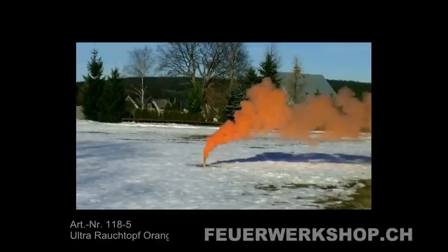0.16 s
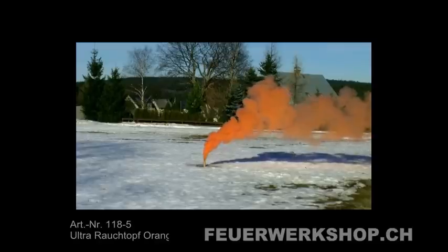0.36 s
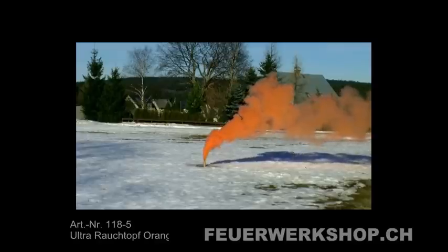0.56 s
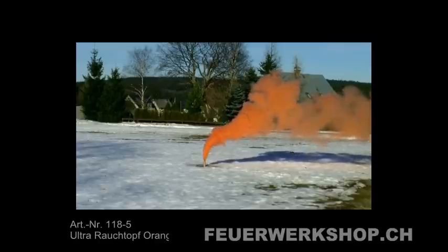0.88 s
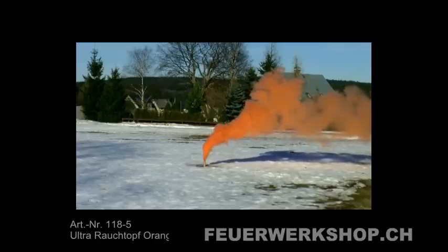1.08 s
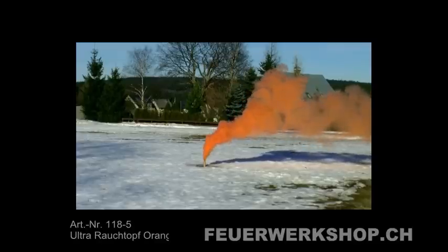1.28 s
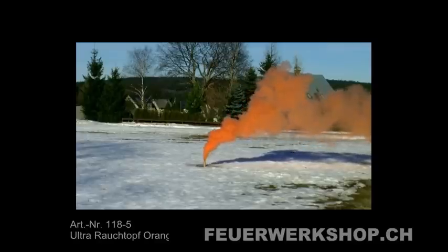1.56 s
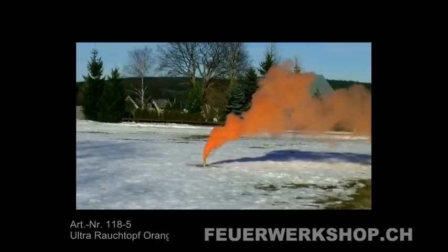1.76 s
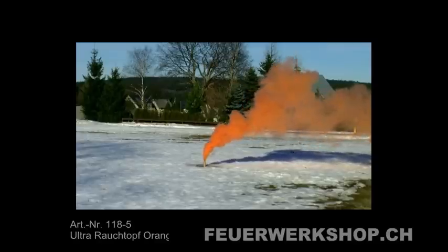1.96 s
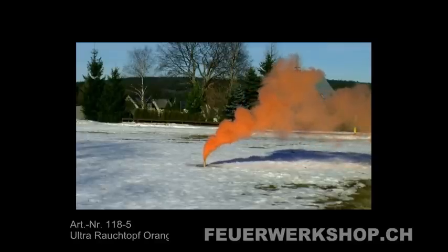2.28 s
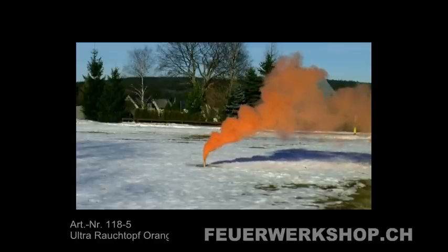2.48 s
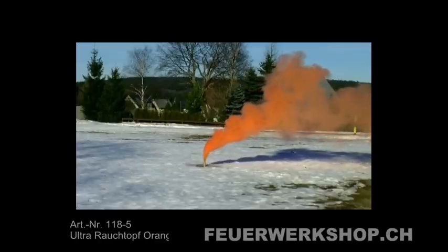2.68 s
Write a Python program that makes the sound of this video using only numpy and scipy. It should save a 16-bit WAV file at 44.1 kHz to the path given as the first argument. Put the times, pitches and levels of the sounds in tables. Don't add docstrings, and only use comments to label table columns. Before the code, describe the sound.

Steady gassy hiss of a burning smoke pot, peppered with snaps, pops and brief sputtering puffs.

```python
import sys
import numpy as np
from scipy import signal
from scipy.io import wavfile
from scipy.ndimage import uniform_filter1d, map_coordinates

SR = 44100
rng = np.random.default_rng(int(sys.argv[2]) if len(sys.argv) > 2 else 0)


def to_linear_factor(level_db):
    exponent = np.asarray(level_db, float) / 20
    return 10 ** exponent


def transcribe(signal):
    frames = np.atleast_2d(signal).T
    limited = np.clip(frames, -1, 1)
    pcm = np.round(limited * 32767).astype(np.int16)
    wavfile.write(sys.argv[1], SR, pcm)


N = 125244

# pitch_hz, level_db (per Hz)
JET_SPECTRUM = [(30, -32), (330, -5.5), (560, -1.5), (1150, -3), (1800, -13.5), (2800, -8), (4300, -18),
                (12000, -22.5)]
# time_s, flow_db
GAS_FLOW = [(0, 0.5), (.15, 1), (.27, 2), (.4, 1), (.65, 1.5), (.85, 2), (1.05, 1), (1.27, 1.5), (1.4, 2),
            (1.58, -0.5), (1.75, -3), (1.9, 4.5), (2.02, -1), (2.1, 2), (2.25, -1.5), (2.55, 0.5),
            (2.62, 0), (2.84, -1.5)]
# time_s, level_db
ROAR_SWELL = [(0, 0.5), (2.0, 0.5), (2.15, 0.2), (2.35, 1.2), (2.45, 0), (2.55, 3), (2.68, 1.4),
              (2.84, 0.3)]
# start_s, level_db
PUFFS = [(2.0882, -41), (2.103, -39), (2.109, -40), (2.1249, -41), (2.142, -44), (2.156, -40),
         (2.1707, -38.5), (2.1871, -39), (2.2018, -40.5), (2.2153, -41), (2.2304, -41), (2.244, -43),
         (2.2604, -40.5), (2.2728, -39.5), (2.2847, -43.5), (2.2977, -41), (2.3113, -39), (2.3217, -43),
         (2.3336, -40.5), (2.3448, -42), (2.358, -39), (2.3713, -41.5), (2.3872, -42), (2.403, -35),
         (2.4144, -39), (2.4363, -39), (2.4566, -43), (2.4682, -37.5), (2.4901, -41), (2.5117, -38),
         (2.53, -41), (2.5626, -48), (2.5837, -52), (2.607, -45), (2.6212, -42)]
# pitch_hz, width_hz, level_db
MOUTH_RESONANCES = [(760, 520, 7.5), (1690, 670, 3), (2330, 760, 3), (2900, 280, -4.5)]
# start_s, peak_db, pitch_hz, width_hz
SNAPS = [(0.0264, -31.8, 9160, 4800), (0.0349, -30.3, 8560, 5000), (0.0571, -30.9, 8460, 4900),
         (0.099, -29.5, 6600, 4300), (0.2358, -30.6, 7690, 4500), (0.2492, -18.4, 6590, 4000),
         (0.2607, -22.1, 7760, 5200), (0.2649, -26.2, 9670, 4000), (0.2686, -29.5, 6820, 5200),
         (0.3146, -32.3, 5470, 3400), (0.3173, -29.2, 8020, 6600), (0.3455, -25.1, 9370, 5000),
         (0.4198, -34.8, 10630, 3100), (0.4603, -29.3, 9050, 4700), (0.4764, -29.4, 7900, 7500),
         (0.6293, -27.0, 9630, 4300), (0.7009, -35.6, 8410, 3800), (0.7464, -34.0, 8510, 4900),
         (0.8071, -17.6, 6480, 3900), (0.8231, -32.1, 8500, 5600), (0.8624, -28.0, 7430, 4100),
         (0.9601, -28.2, 8910, 4300), (1.0148, -35.6, 7530, 5600), (1.0712, -32.7, 7880, 5100),
         (1.1284, -33.6, 6760, 4800), (1.1669, -27.3, 8140, 4100), (1.1911, -31.5, 6200, 5100),
         (1.2191, -32.7, 5540, 3700), (1.2553, -26.4, 7120, 3900), (1.2627, -25.9, 7570, 4000),
         (1.2927, -18.1, 7310, 4000), (1.3368, -22.0, 8270, 3100), (1.4136, -26.1, 7940, 4900),
         (1.4715, -20.7, 6820, 4300), (1.4799, -26.1, 8550, 5000), (1.5124, -28.9, 8610, 3600),
         (1.5661, -22.2, 8570, 3600), (1.5763, -27.5, 7870, 3100), (1.5898, -24.2, 8950, 3500),
         (1.6667, -29.3, 7640, 3800), (1.8571, -31.5, 6630, 4800), (1.8851, -24.7, 8990, 3500),
         (2.0032, -33.0, 6070, 4100), (2.0969, -24.6, 9190, 4600), (2.1637, -10.4, 6500, 9500),
         (2.2976, -21.7, 7330, 4200), (2.5798, -26.9, 9400, 3800), (2.6063, -24.9, 8340, 4600),
         (2.6952, -33.6, 6490, 4100)]
# start_s, peak_db, pitch_hz
POPS = [(.0957, -26, 2600), (.099, -31, 2900), (.2608, -29, 2630), (.3146, -29, 2740), (.4766, -34, 2830),
        (.8073, -25, 3400), (.8245, -35, 3500), (.8633, -36, 3290), (1.0735, -33, 2700),
        (1.1902, -30, 3200), (1.1913, -28, 3200), (1.2192, -32, 3400), (1.2932, -28, 2770),
        (1.4267, -34, 3420), (1.4717, -21.5, 2960), (1.8571, -34, 3100), (1.8854, -31, 2840),
        (2.1636, -19, 2300), (2.2974, -30, 3000), (2.4029, -28, 2300), (2.8064, -34, 2940)]
# start_s, peak_db, pitch_hz
TICKS = [
    (.3225, -62, 8550),
    (.447, -43, 3130),
    (.487, -32, 5150),
    (1.204, -45, 1000),
    (1.328, -30, 8550),
    (1.4825, -31, 9800),
    (1.505, -36, 9600),
    (1.541, -35, 1000),
    (1.557, -40, 990),
    (2.182, -35, 7500),
]
# start_s, peak_db, pitch_hz, width_hz
SPRAYS = [
    (.024, -35.5, 8000, 9000),
    (.2642, -26, 6860, 10000),
    (.483, -33, 5470, 5000),
    (.8228, -36, 6000, 9000),
    (1.257, -38, 8000, 9000),
    (1.8865, -37, 8500, 9000),
    (2.1645, -29.5, 9000, 7000),
]
# pitch_hz, level_db (rms), drift_share (of the pitch)
MOTOR_LINES = [
    (469.6, -61, .003),
    (586.9, -54.5, .0004),
    (939.6, -57.5, .003),
]
# start_s, end_s
MONO_STRETCHES = [(.021, 0.058), (.215, 0.35), (.625, 0.7), (.772, 0.84), (1.138, 1.17), (1.279, 1.386),
                  (1.88, 1.912), (2.068, 2.12), (2.157, 2.23), (2.294, 2.33)]
# start_s, top_hz
TREBLE_REACH = [(0, 13600), (.055, 14200), (.14, 13400), (.195, 14100), (.232, 12400), (.252, 14300),
                (.3, 13700), (.43, 12500), (.5, 13600), (.58, 14100), (.68, 13300), (.79, 12500),
                (.81, 14100), (.865, 12900), (.93, 13400), (1.04, 13000), (1.08, 13500), (1.2, 14300),
                (1.285, 12500), (1.32, 13900), (1.38, 13300), (1.46, 12400), (1.5, 13500), (1.57, 14000),
                (1.68, 13400), (1.875, 14200), (1.935, 13400), (2.09, 12300), (2.169, 14200), (2.18, 13100),
                (2.24, 12700), (2.31, 13200), (2.5, 12500), (2.56, 13700), (2.64, 12700), (2.69, 13200)]

LEFT_OVER_RIGHT_DB = 6.5


def level(x, db):
    return x * to_linear_factor(db) / np.sqrt(np.mean(x ** 2))


def curve(rows):
    return np.interp(np.arange(N) / SR, *np.array(rows).T)


def band(x, hz, width):
    hz = np.clip(hz, 15, .45 * SR)
    return signal.lfilter(*signal.iirpeak(hz, hz / min(width, .3 * SR), fs=SR), x)


def walk(rate):
    hold = int(SR / rate)
    steps = np.repeat(rng.standard_normal(N // hold + 1), hold)
    return 1.49 * uniform_filter1d(uniform_filter1d(steps, hold), hold)[:N]


def pan(db):
    return np.array([[to_linear_factor(db)], [1]]) * 2 / (1 + to_linear_factor(db))


def jet():
    roar_hz, bright_from_hz = 720, 2640
    swell_db, flicker_db, own_flicker_db = -1, 1.6, 0.78
    unlike_db, unlike_bright_db = -19.5, 10
    swell, flow, flicker = walk(0.21), curve(GAS_FLOW), walk(24.64)
    roar = 1.37 * curve(ROAR_SWELL)
    table_hz, table_db = np.array(JET_SPECTRUM).T
    out = 0
    for hz in 30 * 2 ** np.arange(0, 8.9, 1 / 3):
        bright = hz ** 2 / (hz ** 2 + bright_from_hz ** 2)
        db = np.interp(np.log(hz), np.log(table_hz), table_db) + 10 * np.log10(hz)
        db = db + swell_db * swell + own_flicker_db * walk(11.61)
        db = db + np.exp(-np.log2(hz / roar_hz) ** 2) * roar
        db = db + bright * (flow + flicker_db * flicker)
        noise = rng.standard_normal((2, N))
        noise = band(band(noise, hz, hz / 3), hz, hz / 2) / np.sqrt(hz)
        shared = pan(LEFT_OVER_RIGHT_DB) * noise[0]
        unlike = to_linear_factor(unlike_db + unlike_bright_db * bright) * noise[1] * np.array([[1], [-1]])
        out = out + to_linear_factor(db) * (shared + unlike)
    return level(out, -41)


def sputter():
    puff_s, rise_s, mouth_top_hz = .0023, .001, 3600
    when, puff_db = np.array(PUFFS).T
    clicks = np.zeros(N)
    clicks[((when - rise_s) * SR).astype(int)] = to_linear_factor(puff_db)
    t = np.arange(800) / SR
    puff = t / puff_s * np.exp(1 - 2 * t / puff_s)
    gush = signal.fftconvolve(clicks, puff)[:N] * rng.standard_normal(N) + 3.5 * clicks
    gush = signal.sosfilt(signal.butter(6, mouth_top_hz, fs=SR, output="sos"), gush)
    rung = sum(to_linear_factor(db) * band(gush, hz, width) for hz, width, db in MOUTH_RESONANCES)
    return pan(LEFT_OVER_RIGHT_DB) * 4.16 * rung


def ringing(rows, q):
    return np.c_[rows, np.array(rows)[:, 2] / q]


def bursts(rows, tail_s, tail_db, lag_s):
    size = 512
    out, t = np.zeros(N + 1024), np.arange(size) / SR
    spray = rng.standard_normal((len(rows), size))
    for (start_s, db, hz, width), noise in zip(rows, spray):
        push = to_linear_factor(tail_db) * noise * np.exp(-t / tail_s)
        push[0] = -1
        grain = band(band(push, hz, width), hz, 2 * width)
        i = int(max(start_s + lag_s, 0) * SR)
        out[i:i + size] += grain * to_linear_factor(db) / abs(grain).max()
    return pan(LEFT_OVER_RIGHT_DB) * signal.lfilter(*signal.butter(2, 14000, fs=SR), out[:N])


def snaps():
    return to_linear_factor(1.5) * bursts(SNAPS, tail_s=.0018, tail_db=-22, lag_s=-.00015)


def pops():
    return to_linear_factor(-1.5) * bursts(ringing(POPS, 2.5), tail_s=.0015, tail_db=-24, lag_s=-.0003)


def ticks():
    return bursts(ringing(TICKS, 3.6), tail_s=0.0016, tail_db=-9, lag_s=.0008)


def sprays():
    return bursts(SPRAYS, tail_s=0.0063, tail_db=0, lag_s=0)


def fizz():
    per_s, base_db, spread_db, top_db, centre_hz = 270, -47, 4, -35, 6820
    when, size, pitch = rng.random((int(per_s * N / SR), 3)).T
    flow = curve(GAS_FLOW)[(when * N).astype(int)]
    peak_db = np.minimum(base_db + 2.0 * flow - spread_db * np.log(size), top_db)
    hz = centre_hz * 2 ** (1.8 * (pitch - .45))
    grains = np.c_[when * N / SR, peak_db, hz]
    return bursts(ringing(grains, 1.07), tail_s=0.00066, tail_db=-7, lag_s=0)


def motor():
    wobble_db = 2
    hum = np.zeros(N)
    for hz, db, drift in MOTOR_LINES:
        loudness = to_linear_factor(db + wobble_db * walk(9.4))
        phase = 2 * np.pi * hz * np.cumsum(1 + drift * walk(20)) / SR
        hum += loudness * np.sin(phase)
    return pan(LEFT_OVER_RIGHT_DB) * np.sqrt(2) * hum


def wind():
    gust_db = 4 * walk(6.1)
    return level(to_linear_factor(gust_db) * band(rng.standard_normal((2, N)), 32, 40), -83)


def scene():
    mix = snaps() + pops() + wind()
    mix = mix + jet() + ticks() + sprays() + fizz()
    return mix + sputter() + motor()


def housing_echo(dry):
    delay_s, gain = .000478, .27
    places = np.meshgrid([0, 1], np.arange(N) - delay_s * SR, indexing="ij")
    late = map_coordinates(dry, places, mode="nearest")
    late = signal.sosfilt(signal.butter(2, 1500, "high", fs=SR, output="sos"), late)
    return dry - gain * late


def patchy_treble(x):
    mono_from_hz, mono_step_hz = 4000, 700
    patch_from_hz, patch_hz, top_hz = 12400, 172, 14400
    luck_hz, gap_below, patch_db = 150, -.3, 3
    mid_side = np.array([x[0] + x[1], x[0] - x[1]]) / 2
    hz, t, z = signal.stft(mid_side, SR, nperseg=512, noverlap=384)
    at = np.minimum(t * SR, N - 1).astype(int)
    mono = np.any([(t > a) & (t < b) for a, b in MONO_STRETCHES], axis=0)
    for lo in np.arange(mono_from_hz, top_hz, mono_step_hz):
        rows = (hz >= lo) & (hz < lo + mono_step_hz)
        z[1, rows] *= ~mono | (walk(16)[at] > 1.1)
    when, reach_top_hz = np.array(TREBLE_REACH).T
    reach_hz = reach_top_hz[np.searchsorted(when, t, "right") - 1]
    for lo in np.arange(patch_from_hz, top_hz, patch_hz):
        rows = (hz >= lo) & (hz < lo + patch_hz)
        chance = walk(16)[at]
        keep = (lo + patch_hz < reach_hz + luck_hz * chance) & (chance > gap_below)
        z[:, rows] *= to_linear_factor(patch_db) * uniform_filter1d(1. * keep, size=3)
    z[:, hz >= top_hz] = 0
    mid, side = signal.istft(z, SR, nperseg=512, noverlap=384)[1][:, :N]
    return np.array([mid + side, mid - side])


def roll_off(x):
    return signal.sosfilt(signal.butter(12, 15080, fs=SR, output="sos"), x)


def record(dry):
    heard = housing_echo(dry)
    heard = signal.sosfilt(signal.butter(4, 12600, fs=SR, output="sos"), heard)
    mix = patchy_treble(heard)
    return roll_off(mix)


dry = scene()
out = record(dry)
transcribe(out)
```